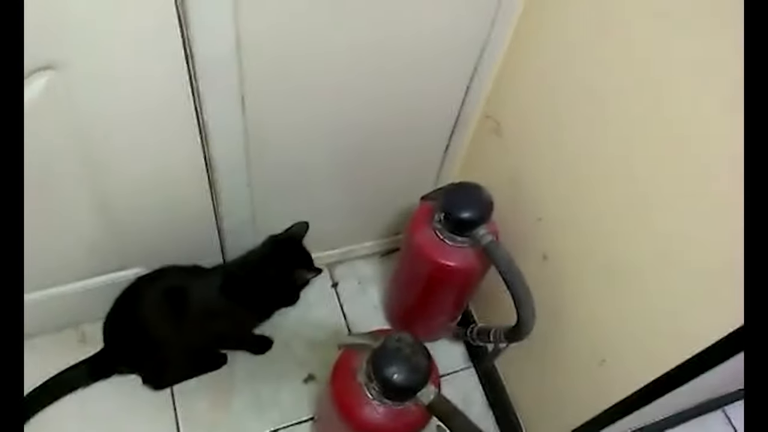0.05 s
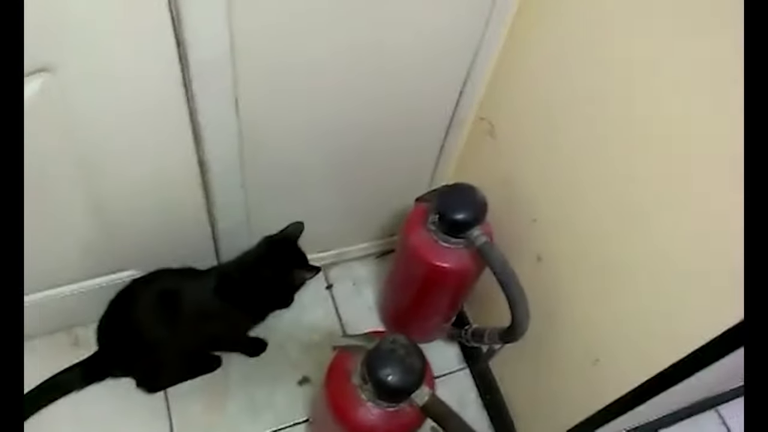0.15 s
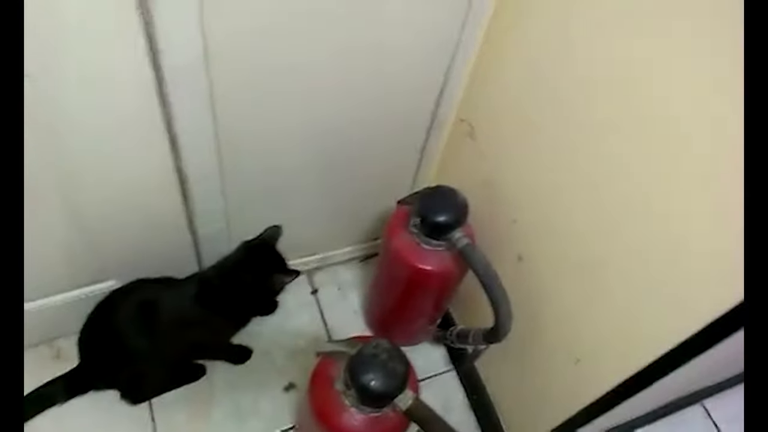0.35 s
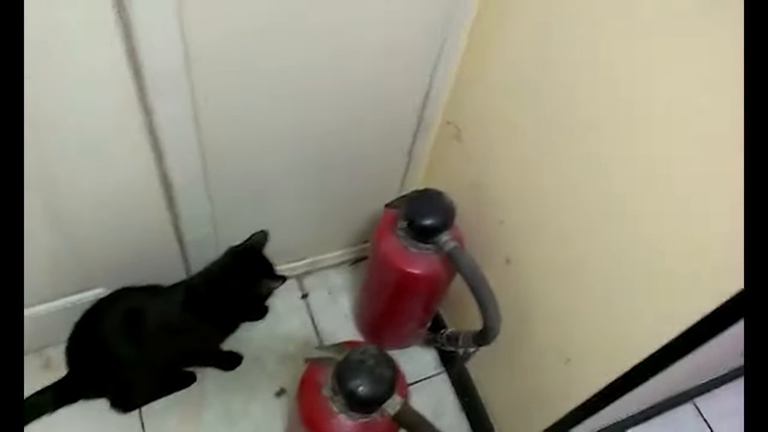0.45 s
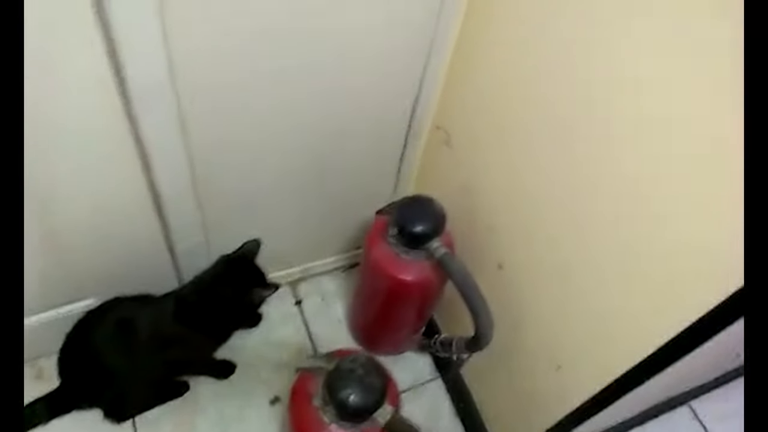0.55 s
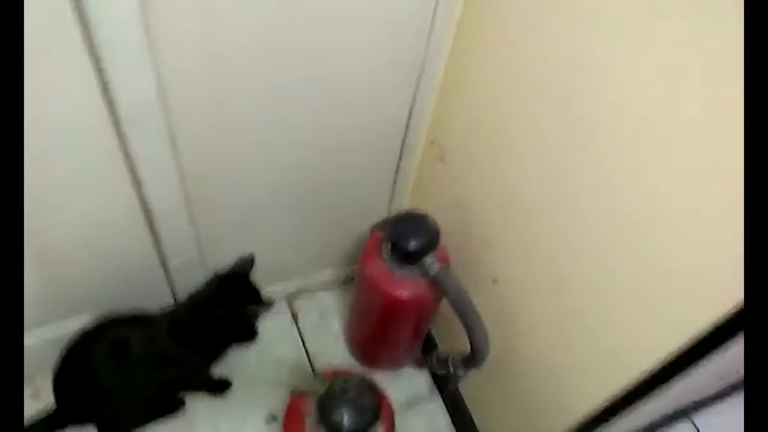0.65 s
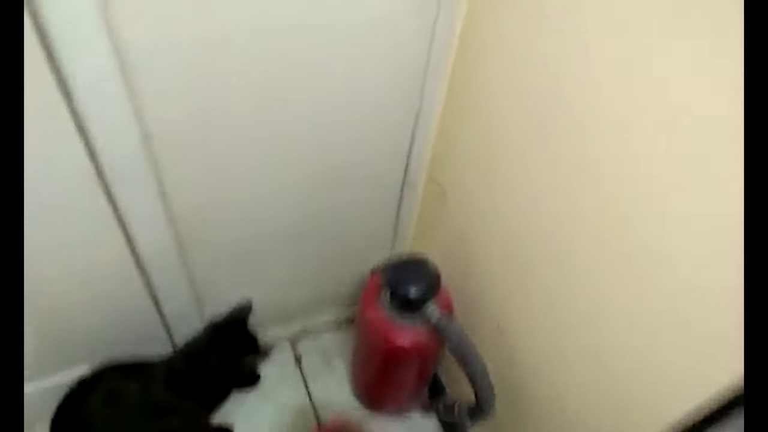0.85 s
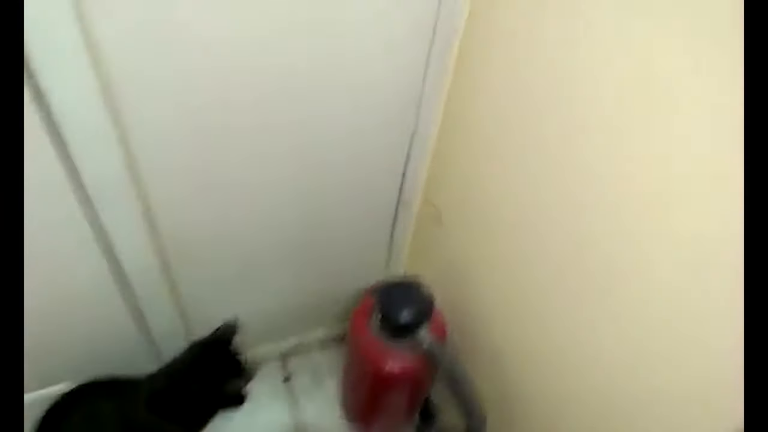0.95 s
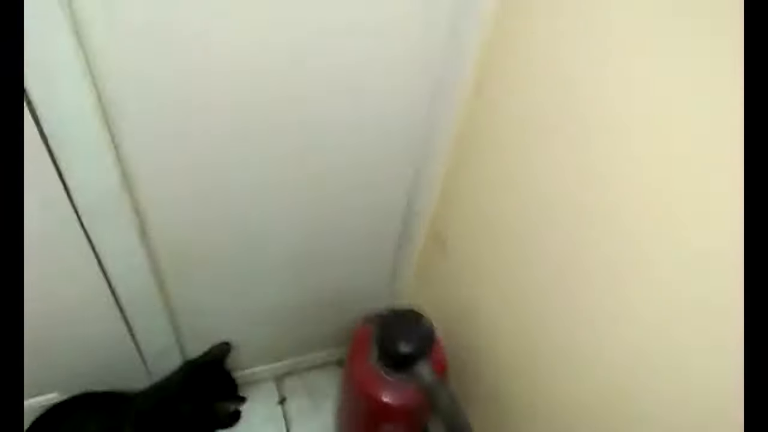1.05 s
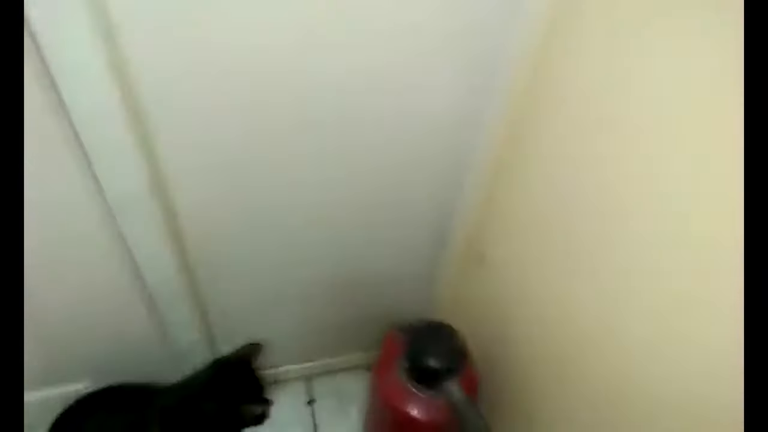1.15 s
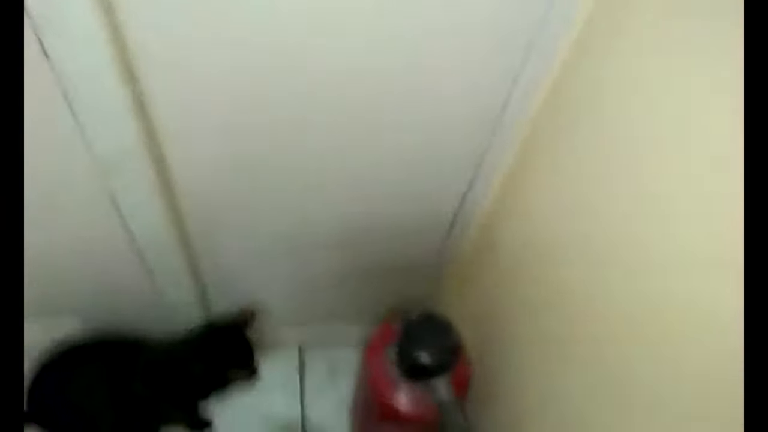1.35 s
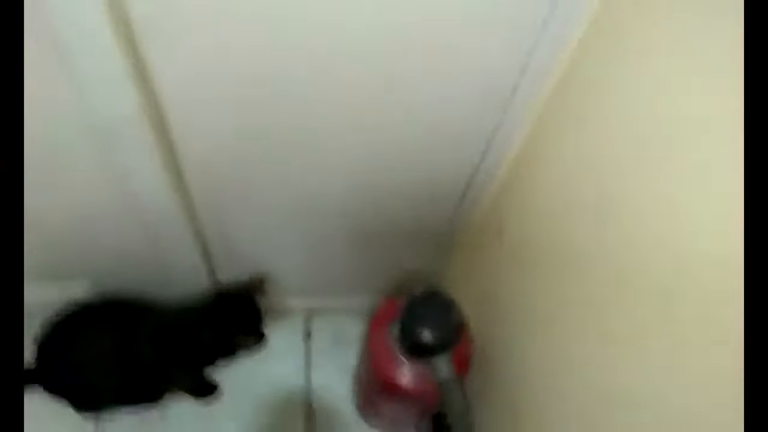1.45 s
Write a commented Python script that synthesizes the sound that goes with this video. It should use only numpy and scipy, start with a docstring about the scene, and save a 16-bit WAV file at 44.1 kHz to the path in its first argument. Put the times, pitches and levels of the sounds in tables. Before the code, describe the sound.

A rat screeches twice in a small tiled room. After a tiny tick and faint scuffs, the first screech runs from about 0.2 to 0.7 seconds, a high, strained whistle wrapped in rasp. The second, from 0.8 to 1.1 seconds, sags in pitch and breaks up. Soft floor scuffs follow at around 1.1 and 1.3 seconds, with light rustling over faint hiss and low rumble.

```python
"""A rat cornered by a cat in a tiled room. Low rumble, hiss and faint rustling run throughout.
A tick and soft floor scuffs come first. The rat screeches at 0.22 s and 0.78 s: a strained, unsteady
whistle with overtones, wrapped in throat rasp, its pitch sagging and breaking up as the effort runs out.
Close walls answer. The rustling has grown by then, and a few more scuffs end the scene."""
import sys
import numpy as np
from scipy import signal
from scipy.fft import rfft, irfft, next_fast_len
from scipy.io import wavfile
from scipy.ndimage import map_coordinates

SR = 44100
rng = np.random.default_rng(int(sys.argv[2]) if len(sys.argv) > 2 else 0)


def unload_wav(signal):
    """Save mono or channel-first audio to the path in sys.argv[1] as 16-bit WAV at rate SR, clipped to [-1, 1]."""
    wavfile.write(
        sys.argv[1],
        SR,
        np.round(np.clip(np.atleast_2d(signal).T, -1, 1) * 32767).astype(np.int16),
    )


N = 66150
T = np.arange(N) / SR


def amp(db):
    """Decibels to gain."""
    return 10 ** (np.asarray(db) / 20)


def unit(x):
    """Scale to rms 1."""
    return x / np.sqrt(np.mean(x ** 2) + 1e-20)


def along(points, hz):
    """Interpolate (freq_hz, value) points on a log frequency axis."""
    freq_hz, values = np.transpose(points)
    return np.interp(np.log(hz + 1), np.log(freq_hz + 1), values)


def curves(rows):
    """One per-sample curve for each column after time_s."""
    time_s, *columns = np.transpose(rows)
    return [np.interp(T, time_s, column) for column in columns]


def wobble(knots_per_s):
    """Smooth random curve, rms 1."""
    return unit(map_coordinates(rng.standard_normal(N // 4), [T * knots_per_s], mode="wrap"))


def filtered(x, response):
    """Apply the gain response(hz) to x."""
    size = next_fast_len(N + SR // 2)
    return irfft(rfft(x, size) * response(np.fft.rfftfreq(size, 1 / SR)), size)[:N]


def shaped_noise(response):
    """Noise with the spectrum response(hz), rms 1."""
    return unit(filtered(rng.standard_normal(N), response))


def noise(spectrum):
    """Noise coloured by (freq_hz, gain_db) points, rms 1."""
    return shaped_noise(lambda hz: amp(along(spectrum, hz)))


# Rustle envelope: time_s, level_db
RUSTLE_ENVELOPE = [(0, -71), (.2, -78), (1.1, -54.5), (1.22, -59.5), (1.3, -60), (1.4, -55.5), (1.45, -63),
                   (1.5, -60.5)]
# Rustle, hiss and rumble spectra: freq_hz, gain_db
RUSTLE_SPECTRUM = [(100, 3.5), (350, -1.5), (1200, -3), (2400, 4), (4500, -2.5), (7000, 1), (10000, -9.5),
                   (15000, -21)]
HISS_SPECTRUM = [(20, 16), (100, 11.5), (150, 7.5), (200, 8), (500, -1), (1500, -2.5), (3000, -6.5),
                 (7000, -11.5), (15000, -14.5)]
RUMBLE_SPECTRUM = [(8, -18), (21, -9), (27, 0), (38, -3.5), (47, -28), (70, -33), (95, -22.5), (125, -64),
                   (400, -87)]

def background(hiss_db=-62, rumble_db=-54.5):
    """A growing rustle of movement over steady hiss and room rumble."""
    rustle_db, = curves(RUSTLE_ENVELOPE)
    rustle = noise(RUSTLE_SPECTRUM) * amp(rustle_db + 0.65 * wobble(knots_per_s=69.5))
    return rustle + amp(hiss_db) * noise(HISS_SPECTRUM) + amp(rumble_db) * noise(RUMBLE_SPECTRUM)


# Tick spectrum: freq_hz, gain_db
TICK_SPECTRUM = [(500, -49), (3500, -4.5), (4800, -19), (6300, 0), (8500, -7), (11300, -13), (13000, -37)]

def tick(peak_s=0.057, level_db=-44.5, sigma_s=0.00061):
    """One tiny, close, dry click: a Gaussian burst of noise."""
    return amp(level_db) * noise(TICK_SPECTRUM) * np.exp(-.5 * ((T - peak_s) / sigma_s) ** 2)


# Floor scuffs: start_s, level_db, attack_s, t60_s, centre_hz, sigma_octaves
FLOOR_SCUFFS = [(0.134, -59.5, 0.0039, 0.53, 3240, 0.7), (.166, -55.5, 0.0048, 0.078, 5540, .8),
                (0.165, -59, .005, 0.087, 612, 0.22), (1.126, -48, 0.0032, 0.14, 3410, 0.84),
                (1.335, -48, 0.0013, 0.086, 2040, 0.67), (1.339, -57, 0.0067, 0.22, 450, 1.0),
                (1.365, -69, 0.013, .25, 3500, 2.1)]

def scuffs():
    """Soft brushes against the floor: noise bands that rise fast and die away."""
    out = np.zeros(N)
    for start_s, level_db, attack_s, t60_s, centre_hz, sigma_octaves in FLOOR_SCUFFS:
        age_s = np.maximum(T - start_s, 0)
        brush = shaped_noise(lambda hz: np.exp(-.5 * (np.log2((hz + 1) / centre_hz) / sigma_octaves) ** 2))
        decay_db = 60 * np.maximum(age_s - attack_s, 0) / t60_s
        out += brush * np.minimum(age_s / attack_s, 1) * amp(level_db - decay_db)
    return out


def fray(pitch_hz, roughness, gain_db=-8.5, reference_roughness=0.046, half_width_hz=360):
    """A noise band that follows the pitch and grows with its roughness."""
    phase = 2 * np.pi * np.cumsum(pitch_hz) / SR
    lowpass = lambda hz: 1 / (1 + (hz / half_width_hz) ** 4)
    band = shaped_noise(lowpass) * np.sin(phase) + shaped_noise(lowpass) * np.cos(phase)
    return amp(gain_db) * roughness / reference_roughness * band


# Overtones before the mouth: harmonic_number, gain_db
HARMONICS = [(2, -5.5), (3, -17.5), (4, -16)]
# Mouth response: freq_hz, gain_db
MOUTH_RESPONSE = [(4500, -7), (5300, -18), (5900, 2), (6600, -13.5), (7300, -5.5), (7750, -0.5),
                  (8200, -19.5), (8800, 2), (9800, -19), (11000, -4), (11700, -1.5), (12500, -2),
                  (15000, -32)]

def whistle(pitch_hz, roughness, overtone_gain_db):
    """A strained, frayed tone of unsteady pitch, its overtones shaped by the mouth."""
    jitter = roughness * wobble(knots_per_s=1700)
    waver = 0.0181 * wobble(knots_per_s=210)
    phase = 2 * np.pi * np.cumsum(pitch_hz * (1 + jitter + waver)) / SR
    harmonics = sum(amp(gain_db) * np.sin(number * phase) for number, gain_db in HARMONICS)
    overtones = filtered(harmonics, lambda hz: amp(along(MOUTH_RESPONSE, hz)))
    return np.sin(phase) + amp(overtone_gain_db) * overtones + fray(pitch_hz, roughness)


# Throat rasp spectra, bright and low: freq_hz, gain_db
RASP_SPECTRUM = [(100, -34), (600, -18), (1500, -22.5), (1850, -9), (2450, 3), (3300, 5), (4300, -1),
                 (4950, -9), (5600, -1.5), (6300, -4), (7200, -2), (8500, -13), (10000, -11.5),
                 (11700, -11.5), (13000, -19.5), (15000, -30)]
LOW_RASP_SPECTRUM = [(100, -47), (300, -18), (460, -16.5), (560, 2.5), (720, -2), (900, -6.5), (1150, -11),
                     (1500, -21), (2500, -66)]

def throat_rasp(rasp_db, low_rasp_db):
    """Noise through the throat, in a bright band and a low one."""
    return amp(rasp_db) * noise(RASP_SPECTRUM) + amp(low_rasp_db) * noise(LOW_RASP_SPECTRUM)


# Pitch contour per screech: time_s, pitch_hz
SCREECH_PITCH = [
    [(.224, 3120), (.238, 3790), (.29, 3863), (.37, 3950), (.45, 3889), (.55, 3866), (.605, 3700),
     (.635, 3306), (.655, 2900)],
    [(.785, 2948), (.81, 3660), (.865, 3649), (.91, 3500), (.952, 3046), (1.0, 2827), (1.04, 2676),
     (1.09, 2785)],
]
# Effort per screech: time_s, whistle_db, overtone_gain_db, rasp_db, low_rasp_db, roughness_ratio
SCREECH_EFFORT = [
    [(.223, -43, -5, -73, -83, 0.032), (.233, -31.5, 0, -42.5, -57, 0.019),
     (.258, -25, -0.5, -35, -54, .033), (.35, -27, 2.5, -33.5, -46.5, 0.0306),
     (.44, -25, 3, -32.5, -51, 0.04), (.53, -27, 3.5, -32.5, -45, 0.025), (.568, -28, 1, -34, -48, 0.026),
     (.58, -33, 5, -35.5, -44.5, 0.048), (.635, -34.5, 7, -35, -51.5, 0.074),
     (.665, -33, -1, -38.5, -54, 0.068), (.682, -40, 1, -56, -63, 0.034), (.70, -49, 5, -75, -86, 0.031)],
    [(.78, -64, -4, -67, -84, .04), (.79, -40.5, -9, -40.5, -57.5, 0.037),
     (.82, -35, -3.5, -41.5, -49.5, 0.031), (.85, -28, -8, -37.5, -49.5, 0.036),
     (.92, -27.5, -15.5, -40, -49.5, 0.039), (.96, -26.5, -10, -49, -53, 0.061),
     (1.035, -29.5, -6, -47.5, -54.5, 0.079), (1.08, -33, -4, -54.5, -73, 0.05),
     (1.11, -52, -8, -73, -70, 0.11)],
]

def screech(pitch, effort, voice_flutter_db=2.5, rasp_flutter_db=1):
    """Whistle and rasp, fluttering together as the voice catches irregularly."""
    pitch_hz, = curves(pitch)
    whistle_db, overtone_gain_db, rasp_db, low_rasp_db, roughness = curves(effort)
    tone = whistle(pitch_hz, roughness, overtone_gain_db)
    flutter = wobble(knots_per_s=380)
    voice = amp(whistle_db) * unit(tone * amp(voice_flutter_db * flutter))
    rasp = throat_rasp(rasp_db, low_rasp_db) * unit(amp(rasp_flutter_db * flutter))
    sounding = (T > effort[0][0]) & (T < effort[-1][0])
    return sounding * (voice + rasp)


# Room decay: freq_hz, t60_s
ROOM_DECAY = [(200, 0.38), (3000, 0.28), (7000, 0.31), (14000, 0.11)]

def tiled_room(x, echo_count=14, max_delay_s=0.014, walls_db=-2, tail_db=-8):
    """Direct sound, quick echoes from the corner and a short tail."""
    hz, time_s, spectra = signal.stft(rng.standard_normal(SR // 2), SR, nperseg=256)
    decay = amp(-60 * time_s / along(ROOM_DECAY, hz)[:, None])
    _, tail = signal.istft(spectra * decay, SR, nperseg=256)
    delay_samples = (rng.uniform(.05, 1, echo_count) * max_delay_s * SR).astype(int)
    signs = rng.choice([-1, 1], echo_count)
    walls = np.bincount(delay_samples, signs, len(tail)) / np.sqrt(echo_count)
    response = amp(tail_db) * tail / np.linalg.norm(tail) + amp(walls_db) * walls
    return (x + signal.fftconvolve(x, response)[:N]) / np.sqrt(1 + np.sum(response ** 2))


def scene():
    """Rat and scuffs through the room; tick and background dry. Mono."""
    rat = sum(screech(pitch, effort) for pitch, effort in zip(SCREECH_PITCH, SCREECH_EFFORT))
    return (tiled_room(rat + scuffs()) + tick() + background())[None]


def record(dry):
    """Brick-wall low-pass at 15.1 kHz."""
    return filtered(dry[0], lambda hz: hz < 15100)[None]


dry = scene()
out = record(dry)
unload_wav(out)
```